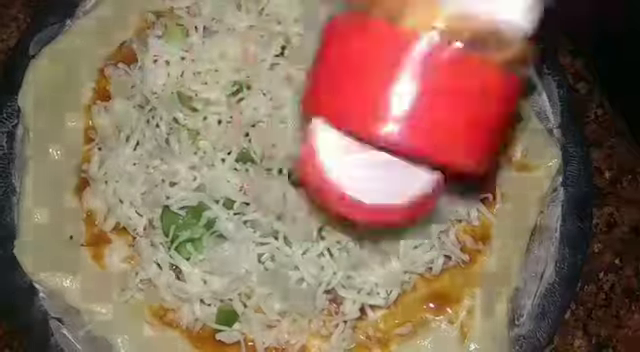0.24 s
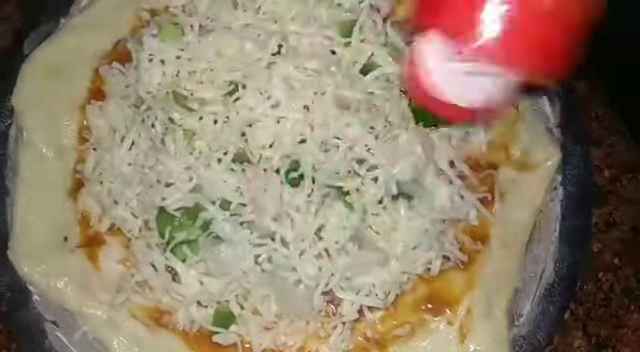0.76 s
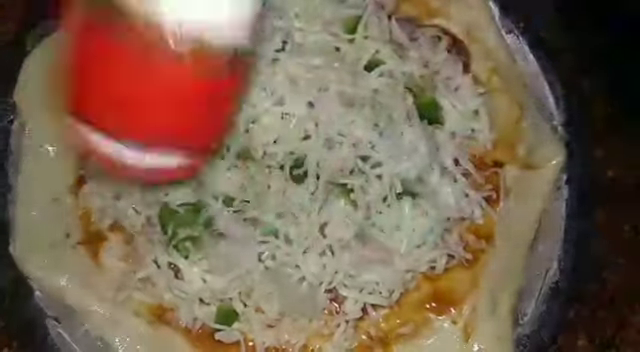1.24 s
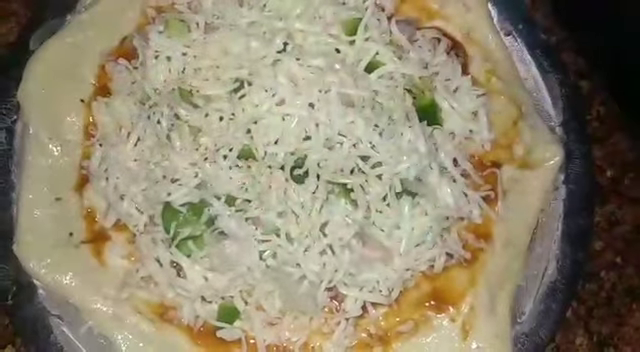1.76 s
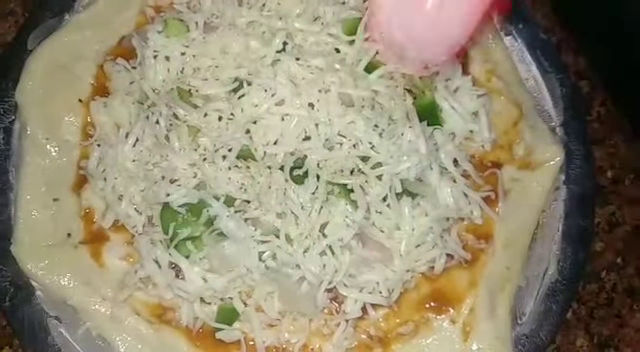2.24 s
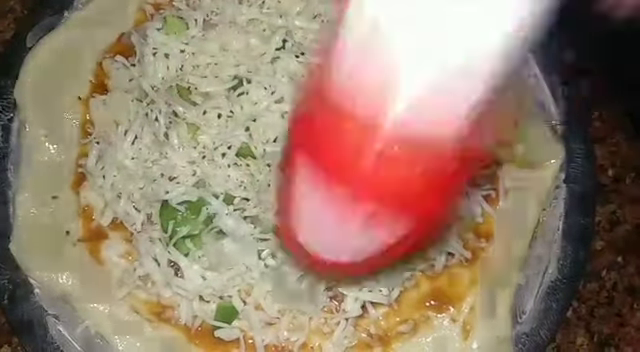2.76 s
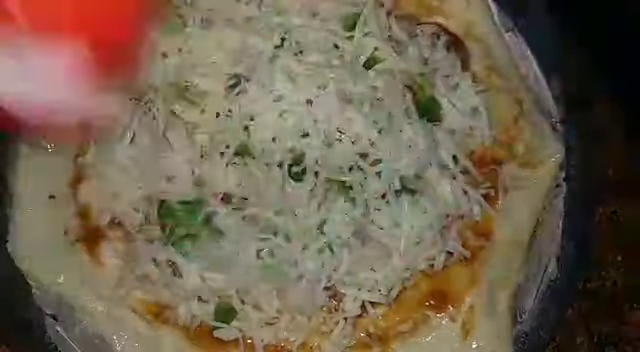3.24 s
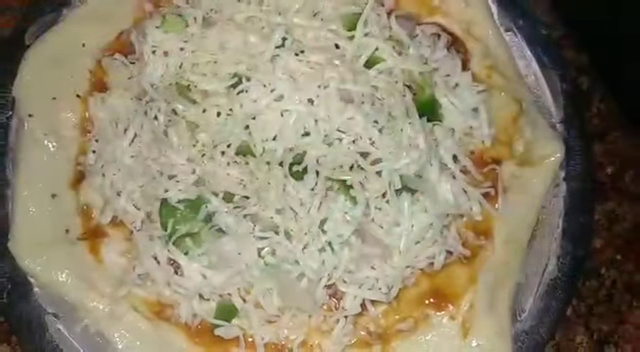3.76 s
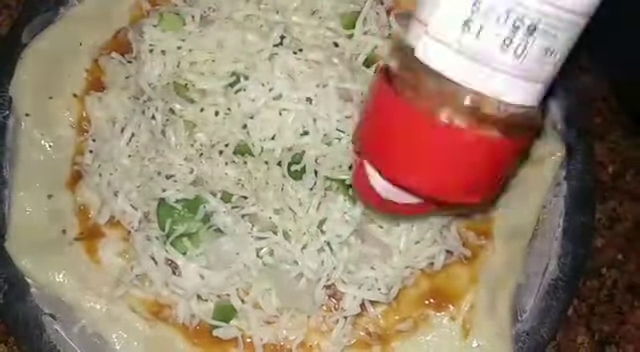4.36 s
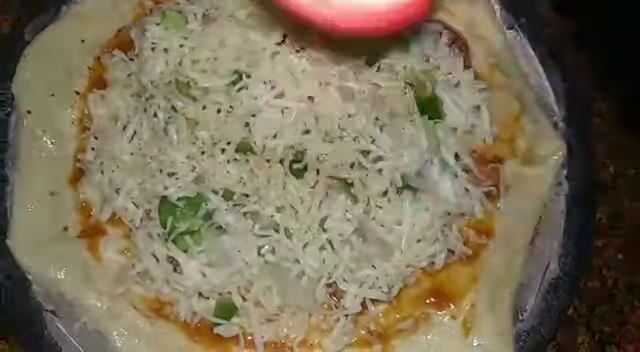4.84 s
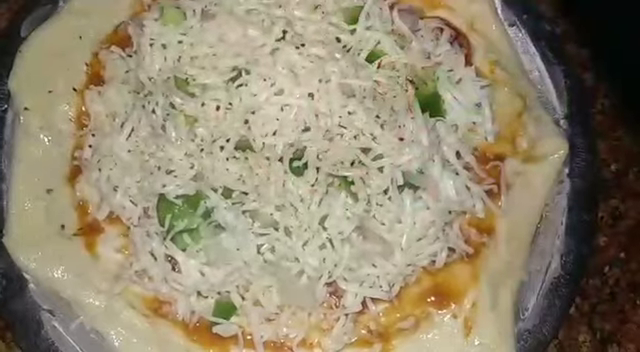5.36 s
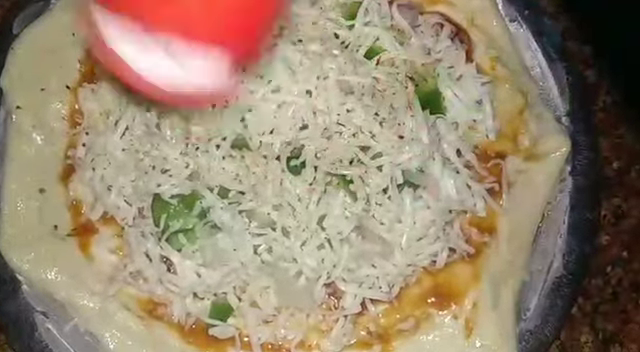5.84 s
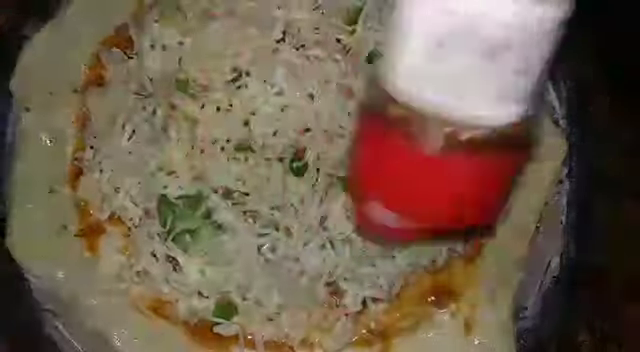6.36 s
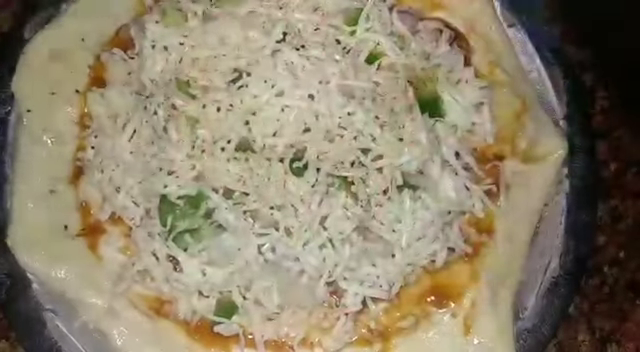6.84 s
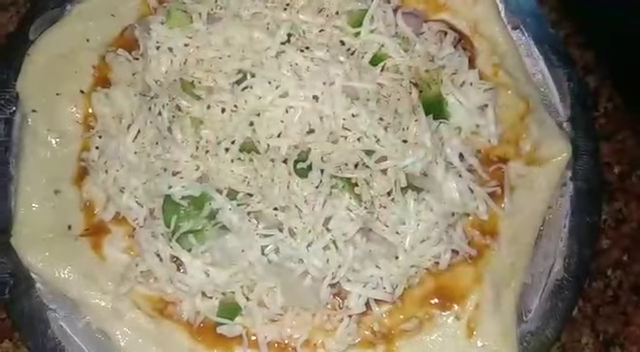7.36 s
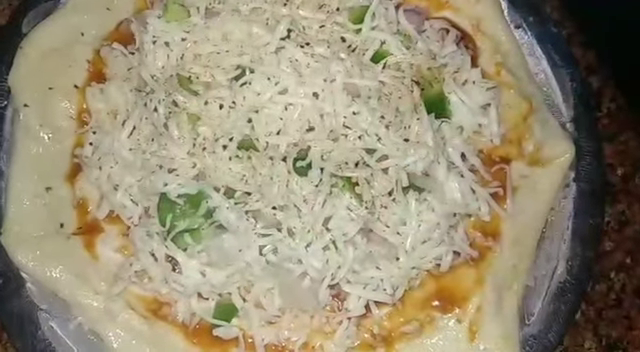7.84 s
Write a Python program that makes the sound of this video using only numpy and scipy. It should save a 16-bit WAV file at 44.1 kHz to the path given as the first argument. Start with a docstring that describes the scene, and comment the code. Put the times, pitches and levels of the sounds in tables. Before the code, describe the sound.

In a small, fairly dry kitchen, a close microphone hears a light plastic shaker full of dry flakes. Gentle overlapping rustles come first, then quick, separate, sharp shakes with snapping ticks, then weaker uneven ones. Midway through the quieter part something bumps and scrapes the counter briefly and metal clinks lightly. A last brisk pair of rattles fades into trickling flakes, with low appliance hum behind.

```python
"""Dry flakes rattle in a plastic jar, shaken by hand close to two microphone ports; hum and room noise lie behind.
Rattle: random impacts through pitched resonators, swelling in noise bursts, with a weaker trickle around each.
Single ticks ping and crack above it. Dull knocks, a short low drag and metal clinks are struck or rubbed resonators.
A faint diffuse tail follows the close sources. A processing step, no source of its own, applies
treble-keyed gain to narrow bands from 250 to 1900 Hz of everything but the direct counter and metal sound."""
import sys
import numpy as np
from scipy import signal
from scipy.fft import rfft, irfft, next_fast_len
from scipy.io import wavfile
from scipy.ndimage import uniform_filter1d

SR = 44100
rng = np.random.default_rng(int(sys.argv[2]) if len(sys.argv) > 2 else 0)


def volts_from_decibels(level):
    """Turn decibel levels (scalar or array-like) into linear amplitude factors."""
    exponent = np.asarray(level, float) / 20
    return 10 ** exponent


def bounce(signal):
    """Save signal as a 16-bit WAV file at the path given by the first command-line argument."""
    frames = np.transpose(np.atleast_2d(signal))
    limited = np.clip(frames, -1, 1)
    pcm = np.round(limited * 32767).astype(np.int16)
    wavfile.write(sys.argv[1], SR, pcm)


N = 357077

# jar wall resonances: pitch_hz, width_hz, relative_db
WALL_MODES = [(1187, 300, -26), (2123, 190, -33), (2745, 42, -32.5), (3600, 46, -33.5), (4510, 290, -28.5),
              (6000, 840, -40)]


def rms_one(x):
    """Scale to rms 1."""
    return x / np.sqrt(np.mean(x ** 2) + 1e-20)


def in_time(rows, outside=None):
    """Join (time_s, value) rows by straight lines, one value per sample."""
    time_s, value = np.transpose(rows)
    return np.interp(np.arange(N) / SR, time_s, value, outside, outside)


def at_hz(points, hz):
    """Read (hz, value) points on a log-frequency axis."""
    point_hz, value = np.transpose(points)
    return np.interp(np.log(hz), np.log(point_hz), value)


def sides(pan_db):
    """Left and right gains for a left-minus-right level difference."""
    return volts_from_decibels(np.array([pan_db / 2, -pan_db / 2]))


def butter(x, order, hz, kind):
    """Butterworth filter."""
    return signal.sosfilt(signal.butter(order, hz, kind, fs=SR, output="sos"), x)


def resonate(x, hz, width_hz):
    """Two-pole resonance with gain 1 at its peak."""
    r = np.exp(-np.pi * width_hz / SR)
    feedback = [1, -2 * r * np.cos(2 * np.pi * hz / SR), r * r]
    return signal.lfilter([(1 - r * r) / 2, 0, (r * r - 1) / 2], feedback, x + 1e-18)


def resonate_twice(x, hz, width_hz):
    """Two equal resonances in series: steeper skirts."""
    return resonate(resonate(x, hz, width_hz), hz, width_hz)


def ring(clicks, hz, t60_s):
    """A unit click starts a decaying sine of initial height 1."""
    r = volts_from_decibels(-60 / (t60_s * SR))
    w = 2 * np.pi * hz / SR
    return signal.lfilter([0, np.sin(w)], [1, -2 * r * np.cos(w), r * r], clicks + 1e-18)


def drift(rate_hz):
    """Slow random curve of rms 1: twice low-passed noise, drawn every 40 samples."""
    r = np.exp(-2 * np.pi * rate_hz * 40 / SR)
    noise = rng.standard_normal(N // 40 + 2002)
    slow = signal.lfilter([1], [1, -2 * r, r * r], noise)[2000:]  # settled part
    return np.interp(np.arange(N) / 40, np.arange(len(slow)), rms_one(slow))


def jar_path(time_s):
    """The jar wanders and tilts: its direction and wall share at the given times."""
    # time_s, pan_db (left minus right), wall_db (jar wall against flake treble, relative)
    path = [(0, -8.5, -9), (0.35, -7.5, -11.5), (0.6, -4.5, -8.5), (0.95, -4.5, -11), (1.3, -9, -10),
            (1.7, -4, -10), (2.1, -5.5, -11), (2.65, -3, -11), (3.0, -6.5, -9), (3.4, -7, -11),
            (3.7, -4.5, -11.5), (4.3, -4, -9), (4.9, -8.5, -9.5), (5.4, -5, -9), (5.85, -7, -8.5),
            (6.1, -8, -9), (6.45, -8, -10), (6.9, -6.5, -9.5), (7.3, -5.5, -10.5), (8.1, -3.5, -9)]
    at_s, pan_db, wall_db = np.transpose(path)
    return np.interp(time_s, at_s, pan_db), np.interp(time_s, at_s, wall_db)


def shaking():
    """Powers of all noise bursts add, each with a weaker, mostly longer trickle of loose flakes around it."""
    # noise bursts: heap landings, and short flake rustles at the metal clinks near 5.79 and 5.82 s:
    # start_s, relative_db, rise_ms (per 10 dB), fall_ms (per 10 dB)
    bursts = [(0.042, -27, 66, 32), (0.148, -28.5, 51, 18), (0.18, -25.5, 15, 11), (0.316, -22.5, 57, 48),
              (0.409, -23, 23, 19), (0.453, -23.5, 25, 28), (0.549, -26, 45, 42), (0.582, -25.5, 15, 33),
              (0.684, -25.5, 23, 38), (0.73, -23, 16, 27), (0.875, -21, 49, 14), (0.979, -21.5, 46, 41),
              (1.013, -23.5, 21, 38), (1.131, -32.5, 35, 21), (1.265, -24, 46, 53), (1.381, -24.5, 32, 26),
              (1.418, -20.5, 23, 25), (1.513, -16.5, 25, 19), (1.556, -19.5, 12, 32),
              (1.669, -19.5, 25, 18), (1.708, -20, 15, 40), (1.808, -16.5, 12, 16), (1.816, -15, 5, 6),
              (1.86, -17, 14, 15.5), (1.968, -19, 31, 21), (2.009, -16, 17, 21), (2.105, -19.5, 19, 13),
              (2.137, -23, 13, 32), (2.372, -14, 19, 9), (2.4, -16, 12, 16.5), (2.642, -11.5, 10.5, 12.5),
              (2.69, -15, 12, 21), (2.903, -9.5, 10.5, 7.5), (2.944, -18, 19, 18), (3.102, -18, 18, 9.5),
              (3.141, -20, 8, 41), (3.274, -16, 20, 13), (3.315, -15.5, 8, 17), (3.446, -16, 20, 10.5),
              (3.484, -17.5, 1, 33), (3.605, -13, 14.5, 14), (3.653, -20.5, 10, 30), (3.782, -16, 18, 20),
              (3.831, -18, 11, 34), (3.944, -24, 14, 14), (3.961, -14, 4, 14), (4.024, -16, 13.5, 19),
              (4.135, -18, 29, 51), (4.19, -13, 8, 10.5), (4.301, -19, 17, 20), (4.357, -16.5, 13, 18),
              (4.477, -17.5, 14.5, 8), (4.509, -20.5, 18, 27), (4.641, -22.5, 20, 52),
              (4.685, -20.5, 14, 34), (4.803, -26, 28, 36), (4.85, -24.5, 38, 43), (4.937, -28, 16, 6),
              (5.047, -20, 37.5, 62), (5.203, -28, 24, 34), (5.241, -29, 22, 62), (5.337, -23, -3, 29),
              (5.35, -21, 16, 47), (5.407, -22, 37, 28), (5.545, -22.5, 18, 12), (5.624, -23, 76, 38),
              (5.72, -37.5, 44, 37), (5.786, -26.5, 1.2, 14), (5.817, -21, 3, 10), (5.908, -25.5, 33, 42),
              (5.957, -23.5, 49, 35), (6.068, -25.5, 22, 35), (6.116, -25.5, 24, 35), (6.262, -31, 30, 14),
              (6.312, -23, 16.5, 30), (6.437, -27, 2, 17), (6.49, -27.5, 50, 24), (6.515, -30, 15, 37),
              (6.62, -35.5, 39, 42), (6.673, -30, 48, 25), (6.842, -21.5, 37, 36), (6.972, -24.5, 64, 60),
              (7.024, -26.5, 38, 20), (7.112, -28.5, 46, 27), (7.14, -21, 13, 33), (7.21, -33, 11, 24),
              (7.224, -26.5, 3, 40), (7.256, -17, 16, 14), (7.301, -17, 8.5, 22), (7.39, -34, 34, 69),
              (7.48, -27.5, 66, 38), (7.522, -27, 30, 77), (7.717, -33, 122, 65)]
    trickle_db, trickle_rise_ms, trickle_fall_ms = -16, 23, 83  # level relative to its burst
    resting_db = -61  # faint rustle while the jar is merely held
    wall_per_db = -0.04  # harder bursts gain more treble than wall
    time_s = np.arange(0, N / SR + 0.002, 0.001)
    start_s, peak_db, rise_ms, fall_ms = np.array(bursts).T[:, :, None]
    late_ms = 1000 * (time_s - start_s)

    def power(top_db, rise, fall):
        """Sum of pulses with straight dB slopes."""
        lost_db = 10 * np.where(late_ms < 0, -late_ms / rise, late_ms / fall)
        return volts_from_decibels(2 * (top_db - lost_db)).sum(axis=0)

    total = power(peak_db, np.maximum(rise_ms, 0.5), fall_ms)
    total = total + power(peak_db + trickle_db, trickle_rise_ms, trickle_fall_ms)
    total = total + volts_from_decibels(2 * resting_db)
    pan_db, wall_db = jar_path(time_s)
    wall_db = wall_db + wall_per_db * (10 * np.log10(total) + 25)
    return [np.interp(np.arange(N) / SR, time_s, curve) for curve in (np.sqrt(total), pan_db, wall_db)]


def flakes(base_rate_hz=7000, spread_db=1.16, clump_db=1.5, patchy_db=2.0, cycles=7.4):
    """Dense tiny impacts, each ringing at its own pitch, with sign and pitch unrelated at the two ports."""
    # flake spectrum: pitch_hz, relative_db (per Hz)
    flake_colour = [(590, -51), (1000, -21), (1220, -17), (1610, -18.5), (2120, -16.5), (2730, -7),
                    (3400, -11), (5520, -3.5), (10400, 1.5), (13600, -2), (15100, -12.5), (15800, -35)]
    # flake stereo lean: pitch_hz, relative_db (left minus right)
    flake_lean = [(60, -2.0), (110, -2.0), (200, -1.5), (380, 2.0), (700, -1.0), (1290, 32.5), (2380, -3.5),
                  (4400, 2), (8120, -1), (15000, -9)]
    # the fingers damp the lowest wall ring: time_s, relative_db
    grip = [(0, 2), (1.3, 1), (2.2, -1), (3.0, 2), (3.5, 1), (4.5, 0.5), (5.1, 2), (6.5, -0.5), (6.9, -4),
            (8.1, -8)]
    envelope, pan_db, wall_db = shaking()
    born = rng.random(N) < base_rate_hz * volts_from_decibels(clump_db * drift(60)) / SR
    strength = volts_from_decibels(spread_db * np.minimum(rng.exponential(1, N), 5))
    hits = born * strength * rng.choice([-1, 1], (2, N))
    pitches = np.geomspace(1700, 15500, num=26)
    dealt = rng.choice(len(pitches), (2, N), p=pitches / pitches.sum())  # high flakes are the most common
    low, high = 0, 0
    for k, hz in enumerate(pitches):
        grain = rms_one(resonate(hits * (dealt == k), hz, min(hz / cycles, 900)))
        # each pitch band's level drifts at random
        colour = np.sqrt(hz) * volts_from_decibels(at_hz(flake_colour, hz) + patchy_db * drift(18.5))
        grain = grain * colour * sides(at_hz(flake_lean, hz) + 4)[:, None]
        if hz < 5500:
            low = low + grain
        else:
            high = high + grain
    scale = np.sqrt(np.mean((low + high) ** 2))
    heavy = hits * (np.abs(hits) > volts_from_decibels(3.0))  # only the stronger hits ring the wall
    wall = 0
    for hz, width_hz, mode_db in WALL_MODES:
        gain_db = mode_db + 5.1 * drift(10.0) + (hz < 1500) * in_time(grip)
        wall = wall + volts_from_decibels(gain_db) * rms_one(resonate_twice(heavy, hz, width_hz))
    rattle = high / scale + volts_from_decibels(wall_db + 11.5) * (low / scale + wall)
    return volts_from_decibels(-1.5) * envelope * sides(pan_db) * butter(rattle, 2, 1300, "high")


def ticks(ring_t60_s=0.014, ring_db=-0.5, crack_db=0.0):
    """A larger flake strikes the wall: a short ping and a bright noise crack that also rings the jar."""
    # single hard flakes: start_s, relative_db, pitch_hz
    hard_flakes = [(0.1717, -22, 4600), (0.2331, -42, 8000), (0.2437, -28, 8200), (0.7281, -29, 7300),
                   (0.8471, -24, 6550), (0.873, -22, 7430), (0.9396, -33, 8500), (1.2631, -21, 5940),
                   (1.3285, -24, 6800), (1.553, -20, 10200), (1.5578, -10.5, 6800), (1.664, -15.5, 10000),
                   (1.6741, -21, 10800), (1.7106, -15.5, 7600), (1.8072, -16.5, 5700), (2.1045, -29, 7050),
                   (2.3321, -28, 10500), (2.3467, -23, 11000), (2.6336, -19, 10100), (2.6907, -17, 7800),
                   (2.941, -18, 7000), (3.096, -10.5, 6050), (3.1396, -10.8, 5540), (3.261, -18, 10600),
                   (3.413, -27, 8400), (3.4345, -23, 8850), (3.442, -17.5, 9000), (3.4876, -11, 5080),
                   (3.5784, -26, 11000), (3.6575, -8, 5170), (3.779, -16.3, 10500), (3.8328, -11, 8550),
                   (3.9238, -36, 9600), (3.9618, -18, 8800), (4.0156, -14, 10900), (4.1115, -22.6, 10000),
                   (4.19, -20, 5350), (4.4618, -28, 7500), (4.5818, -38, 4200), (4.633, -22, 11000),
                   (4.6823, -13.5, 5460), (4.765, -26, 6000), (5.1428, -40, 9000), (5.161, -32, 8400),
                   (5.2, -23.5, 6200), (5.28, -31, 8400), (5.346, -19.5, 9500), (5.631, -22, 8800),
                   (5.7707, -30, 6900), (5.9867, -22, 5160), (6.226, -33, 9700), (6.2984, -24, 6600),
                   (6.4261, -37, 5100), (6.437, -28, 9000), (6.456, -35, 10600), (6.7694, -29, 8560),
                   (6.7818, -32, 8100), (6.8027, -21, 8700), (6.8115, -20, 8700), (7.137, -17.7, 8200),
                   (7.2067, -32.7, 11000), (7.2326, -24, 8200), (7.2742, -28, 8700), (7.481, -20.5, 9800),
                   (7.7037, -36, 7300), (7.7167, -34, 9000)]
    # fingertip taps that ring chiefly the wall: start_s, relative_db (drive into the wall)
    finger_taps = [(2.8545, 7.5)]
    wall_base_db, wall_follows = -13, 0.65  # wall drive for a 0 dB tick; share of the tick's level it follows
    hits = [(s, db, wall_base_db + wall_follows * db, hz) for s, db, hz in hard_flakes]
    hits += [(s, db - 39, db, 3800) for s, db in finger_taps]
    burst = np.zeros((2, 2, N + 1000))  # (bright, wall) x (left, right)
    ping = np.zeros((2, N + 1000))
    t = np.arange(1000) / SR
    fade = volts_from_decibels(-t / 0.00053)  # 1 dB per 0.53 ms
    noises = rng.standard_normal((len(hits), 2, 1000))
    for (start_s, bright_db, wall_db, hz), noise in zip(hits, noises):
        at = round(start_s * SR)
        pan = sides(jar_path(start_s)[0])[:, None]
        burst[:, :, at:at + 1000] += volts_from_decibels([[[bright_db + crack_db]], [[wall_db]]]) * pan * noise * fade
        tone = np.sin(2 * np.pi * (hz * t + noise[:, :1]))  # random phase at each port
        tone = tone * np.minimum(t / 0.00021, 1) * volts_from_decibels(-60 * t / ring_t60_s)
        ping[:, at:at + 1000] += volts_from_decibels(bright_db + ring_db) * pan * tone
    bright, drive = burst[:, :, :N]
    out = ping[:, :N] + butter(bright, 2, [4500, 12000], "band")
    out = out + volts_from_decibels(-32) * resonate(drive, 2200, 2400)
    for hz, width_hz, mode_db in WALL_MODES[1:]:
        out = out + volts_from_decibels(mode_db) * resonate(drive, hz, width_hz)
    return out


def counter_drag():
    """Something is dragged briefly: noise through three low resonances."""
    # drag level: time_s, rms_db
    drag = [(4.87, -57), (4.9, -45.5), (4.956, -44.5), (5.02, -43), (5.048, -39), (5.06, -51)]
    rub = rng.standard_normal(N)
    body = resonate(rub, 161, 26) + volts_from_decibels(-12.0) * resonate(rub, 230, 90) + volts_from_decibels(-10.0) * resonate(rub, 320, 74)
    return volts_from_decibels(in_time(drag, outside=-120)) * rms_one(body)


def counter_knocks():
    """Each soft knock rings the counter for a few cycles, with a weaker, shorter overtone."""
    # knocks: start_s, relative_db, pitch_hz, t60_s
    knocks = [(1.999, -46, 345, 0.03), (3.041, -41, 253, 0.03), (4.882, -31, 224, 0.024),
              (5.0418, -25.5, 343, 0.053), (5.258, -41, 170, 0.029), (5.288, -39.5, 168, .05),
              (5.487, -40.5, 328, 0.049), (5.8, -34.5, 242, 0.025), (5.833, -34, 330, 0.018),
              (5.855, -43, 328, 0.017), (6.189, -32, 335, 0.017), (6.498, -36, 324, 0.036)]
    out = 0
    for start_s, knock_db, hz, t60_s in knocks:
        click = np.zeros(N)
        click[round(start_s * SR)] = -volts_from_decibels(knock_db + 7.5)
        overtone = ring(click, 2.25 * hz, t60_s / 3) + volts_from_decibels(-4.0) * click
        out = out + resonate(ring(click, hz, t60_s), hz, 590) + volts_from_decibels(-9.0) * resonate(overtone, 1070, 900)
    return out


def clinks():
    """Each touch is a rattling contact of a few ms that strikes every metal mode, differently for each port."""
    # touches: start_s, relative_db
    touches = [(5.7847, -25), (5.818, -21), (5.856, -32)]
    # metal modes: pitch_hz, relative_db, t60_s
    metal = [(840, -5.5, 0.037), (1020, -14, 0.14), (2900, 2, 0.032), (2980, -1, 0.053), (3110, 0, 0.1),
             (4247, -4, 0.026), (5440, -1, .025), (5740, 4, 0.085), (1420, -18, 0.063), (6850, -19, .1),
             (8250, -3, 0.04), (9200, -4, 0.038), (9660, -3, 0.07), (10750, -15, .1), (12300, -1, .05),
             (14240, -10, .04)]
    t = np.arange(300) / SR
    contact = volts_from_decibels(-t / 0.0001)  # 1 dB per 0.1 ms
    out = np.zeros((2, N))
    for hz, mode_db, t60_s in metal:
        clicks = np.zeros((2, N))
        noises = rng.standard_normal((len(touches), 2, 300))
        for (start_s, touch_db), noise in zip(touches, noises):
            at = round(start_s * SR)
            push = np.cos(2 * np.pi * hz * t + noise[:, :1]) * (1 + 0.5 * noise) * contact / contact.sum()
            clicks[:, at:at + 300] = volts_from_decibels(touch_db + mode_db - 2.0) * sides(-7.0)[:, None] * push
        out += ring(clicks, hz, t60_s)
    return out


def kitchen(x, t60_s=0.78, wet_db=-23):
    """Diffuse tail cut at 0.3 s: decaying noise, different at each port."""
    size = int(0.3 * SR)
    tail = rng.standard_normal((2, size)) * volts_from_decibels(-60 * np.arange(size) / SR / t60_s)
    tail = tail / np.sqrt((tail ** 2).sum(axis=1, keepdims=True))
    return volts_from_decibels(wet_db) * signal.fftconvolve(x, tail, axes=1)[:, :N]


def room_noise():
    """Half-octave noise bands of set left-right likeness, with appliance hum, whir and room resonances."""
    # room noise spectrum: pitch_hz, relative_db (per Hz)
    air = [(18, -70), (30, -50), (92, -1), (129, -8.5), (216, -9), (304, -15), (485, -5), (524, -22),
           (567, -15), (1270, -25), (1600, -21), (12200, -23.5), (15000, -55)]
    # room noise stereo lean: pitch_hz, pan_db (left minus right)
    air_lean = [(40, 5), (150, -8.5), (300, 4.5), (600, -1), (1200, 2), (6000, 0.5)]
    # left-right likeness: pitch_hz, correlation (-1 to 1)
    likeness = [(60, 1), (180, 0.56), (550, -0.019), (1650, -0.49), (4970, 0.5), (15000, -1)]
    # hum lines: pitch_hz, relative_db
    hum_lines = [(100.2, -53.5), (160, -70), (349.5, -80), (438.2, -63), (487, -58.5)]
    # soft noise band near 900 Hz: time_s, relative_db
    whir_path = [(0, -59.5), (2.2, -60.5), (3.0, -68), (5.7, -69), (8.1, -71.5)]
    # swelling and fading room resonances: pitch_hz, width_hz, relative_db
    boom_modes = [(160.7, 13, -67.5), (212, 20, -64.5), (271.5, 20, -66), (349.4, 48, -65.5)]
    white = rng.standard_normal((2, 2, N))
    hiss, corners_hz = 0, 30 * 2 ** np.arange(0, 9.1, 0.5)
    for k, (low_hz, high_hz) in enumerate(zip(corners_hz, corners_hz[1:])):
        mid, side = butter(white[k % 2], 2, [low_hz, high_hz], "band")
        hz = np.sqrt(low_hz * high_hz)
        alike = np.clip(at_hz(likeness, hz), -1, 1)
        pair = np.sqrt(1 + alike) * mid + np.sqrt(1 - alike) * side * [[1], [-1]]
        hiss = hiss + volts_from_decibels(at_hz(air, hz)) * pair * sides(at_hz(air_lean, hz))[:, None]
    hum = 0
    for hz, line_db in hum_lines:
        gain = volts_from_decibels(line_db + 0.5 + 1.7 * drift(2.7))
        hum = hum + gain * np.sin(2 * np.pi * np.cumsum(hz + 0.32 * drift(1.5)) / SR)
    whir = volts_from_decibels(in_time(whir_path) + 10.5) * rms_one(resonate(rng.standard_normal((2, N)), 920, 160))
    boom = 0
    for k, (hz, width_hz, mode_db) in enumerate(boom_modes):
        boom = boom + volts_from_decibels(mode_db + 5.4 * drift(4.3)) * rms_one(resonate_twice(white[k % 2, 0], hz, width_hz))
    return volts_from_decibels(-48.5) * rms_one(hiss) + (hum + boom) * sides(-0.19)[:, None] + whir


def treble_keyed_gain(x, smooth_s=0.04):
    """Processing, not a source: turns narrow bands down by treble level over drifting thresholds, lower at right."""
    # low_hz, high_hz, left_db, right_db (mean treble thresholds), slope (dB lost per dB above)
    keyed_bands = [(250, 360, -19, -24, 5), (360, 470, -16, -25, 5), (530, 690, -27, -31, 9),
                   (690, 860, -30, -32, 9), (860, 1000, -26, -30, 8), (1000, 1180, -21, -28, 7),
                   (1180, 1330, -18, -24, 6), (1330, 1500, -21, -28, 8), (1500, 1720, -25, -29, 8),
                   (1720, 1900, -17, -26, 6)]
    treble = butter(x, 2, 3000, "high")
    power = uniform_filter1d(np.mean(treble ** 2, axis=0), int(smooth_s * SR))
    treble_db = 10 * np.log10(power + 1e-12)
    size = next_fast_len(N + SR)
    spectrum, hz = rfft(x, size), np.arange(size // 2 + 1) * SR / size
    out = x
    for low_hz, high_hz, left_db, right_db, slope in keyed_bands:
        # band edges are 30 Hz ramps
        mask = np.clip((hz - low_hz) / 30 + 0.5, 0, 1) - np.clip((hz - high_hz) / 30 + 0.5, 0, 1)
        band = irfft(spectrum * mask, size)[:, :N]
        over_db = treble_db + 3.65 * np.array([drift(8.7), drift(8.9)]) - [[left_db], [right_db]]
        out = out - band * (1 - volts_from_decibels(-slope * np.maximum(over_db, 0)))
    return out


def scene():
    """Jar, tail and room noise pass the treble-keyed gain; direct counter and metal sound bypass it."""
    jar = flakes() + ticks()
    bench = clinks() + counter_drag() + counter_knocks()
    return treble_keyed_gain(jar + kitchen(jar + bench) + room_noise()) + bench


def roll_off(x):
    """The treble ends steeply here."""
    return signal.sosfilt(signal.butter(12, 16160, fs=SR, output="sos"), x)


def record(dry):
    """A steep low-pass cuts the top, 60 dB down from 16.5 kHz."""
    cut = signal.sosfilt(signal.cheby2(14, 60, 16500, fs=SR, output="sos"), dry)
    return roll_off(cut)


dry = scene()
out = record(dry)
bounce(out)
```